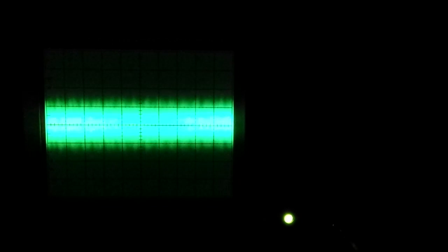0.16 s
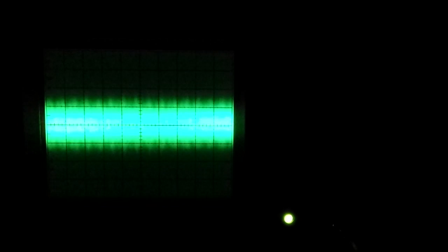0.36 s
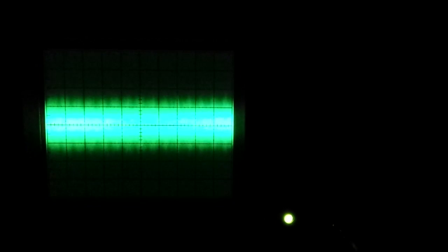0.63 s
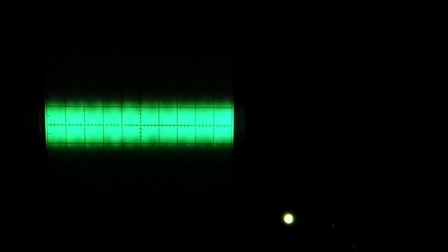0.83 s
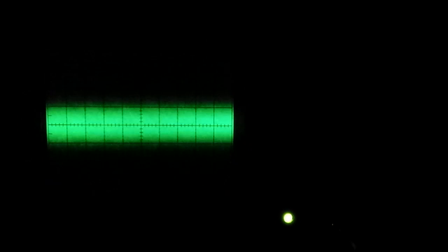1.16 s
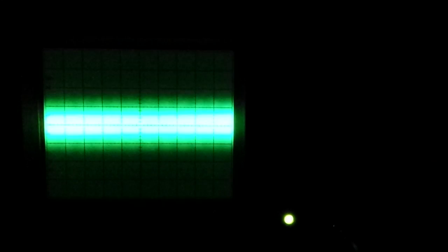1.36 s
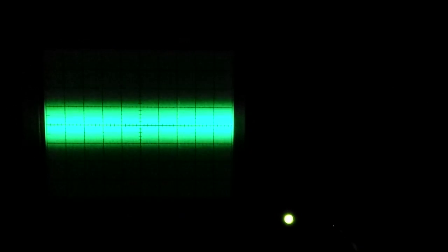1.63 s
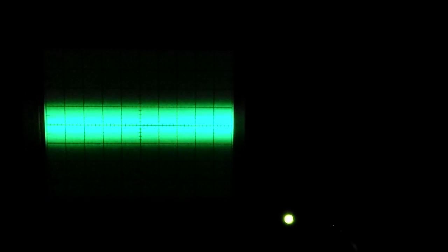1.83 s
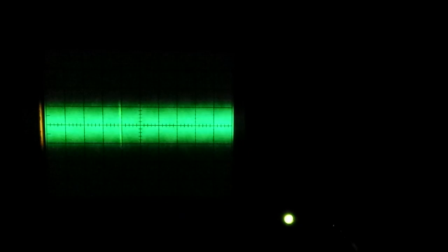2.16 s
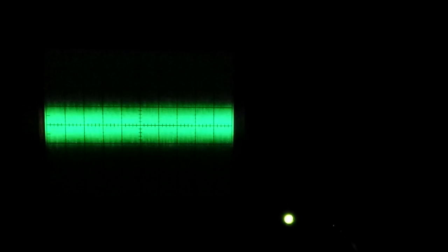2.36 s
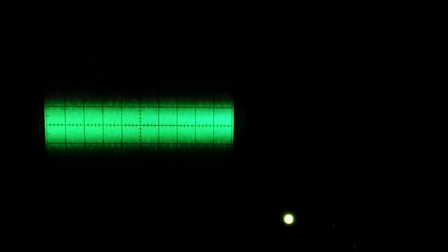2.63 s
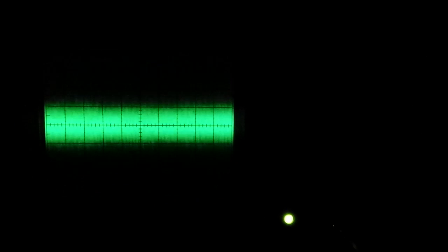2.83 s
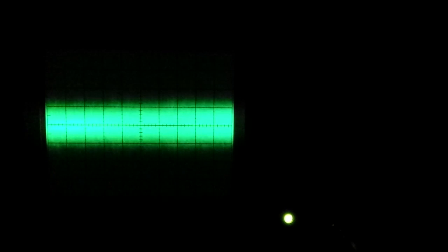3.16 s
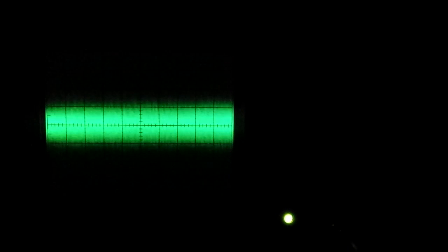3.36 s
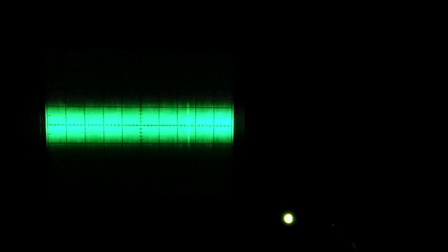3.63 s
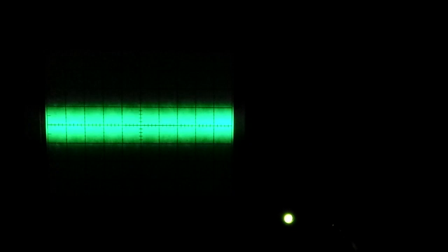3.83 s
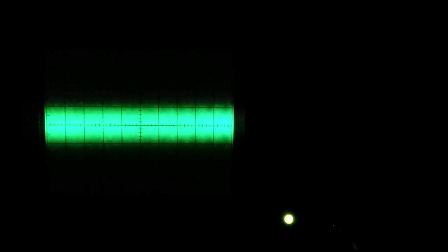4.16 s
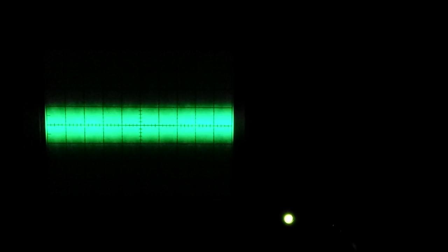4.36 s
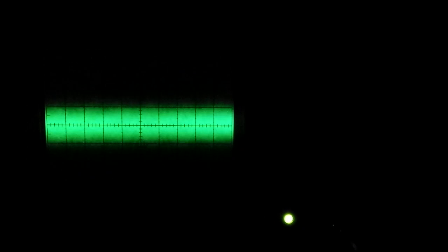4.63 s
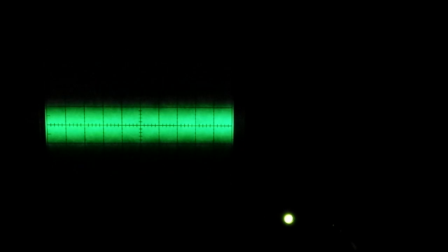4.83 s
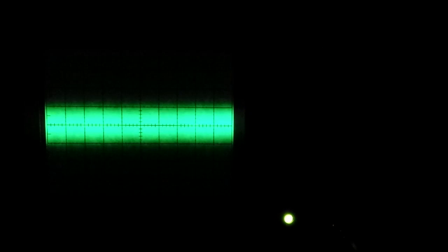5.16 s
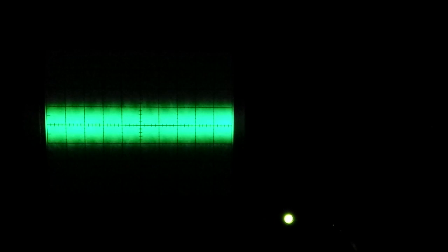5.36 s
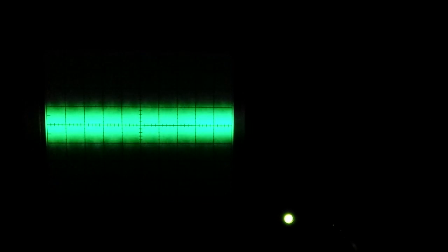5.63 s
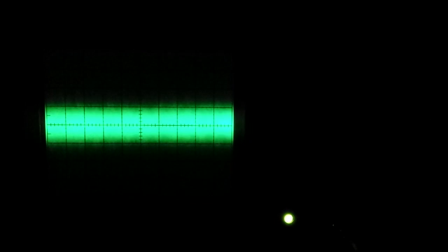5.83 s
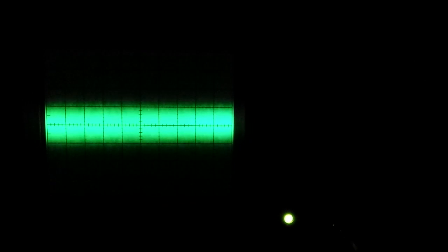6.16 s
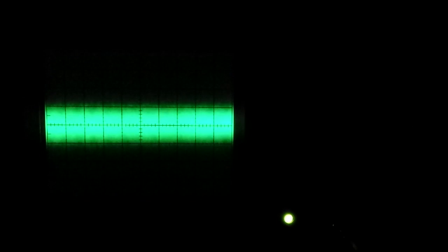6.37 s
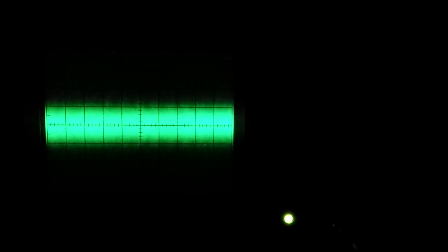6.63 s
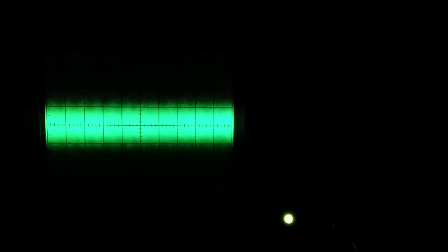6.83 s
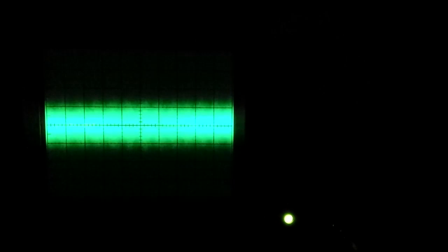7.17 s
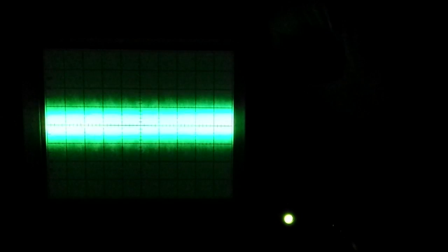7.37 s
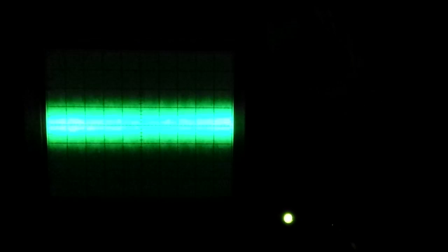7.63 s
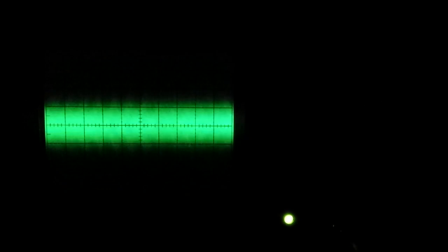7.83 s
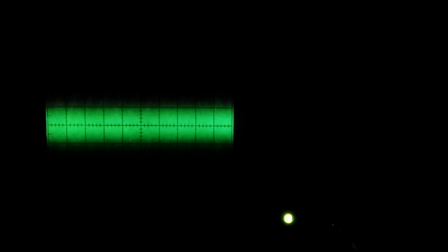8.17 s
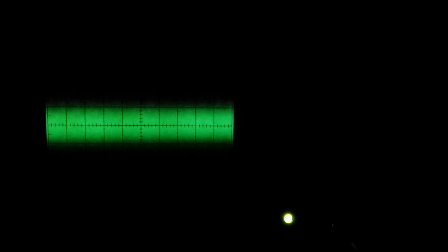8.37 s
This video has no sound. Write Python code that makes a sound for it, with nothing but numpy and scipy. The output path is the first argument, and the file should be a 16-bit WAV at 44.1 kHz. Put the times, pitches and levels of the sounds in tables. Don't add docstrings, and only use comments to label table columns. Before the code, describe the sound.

In a small quiet room, a close, bright stereo microphone with soft hiss and low rumble picks up rotary switches on a metal instrument case. A very faint far motor hums around 0.3 to 2 seconds, with a weaker touch near 3.6. Crisp bouncing snaps come at 0.6, 0.9, 1.2 and 1.4 seconds, then a quick run of five from 2.0 to 2.25, the first the sharpest. A softer click follows at 2.8, three more at 3.2, 3.3 and 3.5, and weaker ones at 4.35 and 4.85. Each has a shaft knock, faint case ring and short echo. Barely audible squeaks precede the last two clicks. Light finger taps begin near 4.8, with a tiny spring ping at 5.45, soft touches from 6.05, the loudest tap at 6.36 and a faint one at 6.8. Only hiss and rumble remain until 8.5.

```python
import sys
import numpy as np
from scipy import signal
from scipy.io import wavfile
from scipy.ndimage import uniform_filter1d

SR = 44100
rng = np.random.default_rng(int(sys.argv[2]) if len(sys.argv) > 2 else 0)


def inscribe(sig):
    pcm = np.round(np.clip(np.atleast_2d(sig).T, -1, 1) * 32767)
    wavfile.write(sys.argv[1], SR, pcm.astype(np.int16))


def ratio(d):
    e = np.asarray(d, float) / 20
    return 10 ** e


N = 375368

# t/s, level/dB
DRIFT = [(0, 8), (.5, 4.5), (2.7, 3.5), (4.1, 1.1), (4.7, 1), (5.3, 0.5), (6, 2.3), (7.4, 4), (7.7, 1.5),
         (8.51, 3.3)]
# f/Hz, level/dB (per Hz)
AIR = [(12, -30), (20, -4), (27, -11.5), (80, 1.5), (300, -5.5), (500, -6.5), (816, -11.5), (2120, -17),
       (4400, -18.5), (6710, -8), (9670, -19), (14900, -19.5), (15500, -25), (15800, -51)]
# f/Hz, likeness/1
AIR_LIKENESS = [(60, 0.34), (180, 0.54), (550, 0.27), (1650, 0.012), (4970, 0.0091), (15000, 0.12)]
# f/Hz, level/dB
AIR_LEAN = [(60, -0.5), (180, -4.5), (550, -2), (1650, 0), (4970, -9.0), (15000, -3)]
AIR_DB = -64.5
RUMBLE_SHARE, MOTOR_RUMBLE_DB, MOTOR_LEAVES_S, LEAVING_S = 0.71, 2, 2.2, 0.48

# t/s, hold/s, level/dB
MOTOR_LOADS = [
    (.25, .8, -63.5),
    (1.25, .75, -66),
    (3.6, .25, -73),
]
HUM_HZ, HUM_IDLE_DB = 71.5, -79
HUM_RISE_DB_PER_S, HUM_FALL_DB_PER_S = 55, 32

# first contact t/s, snap peak level/dB, blow to shaft and panel level/dB,
# case boom level/dB, hardest bounce after t/ms
DETENTS = [(0.6350, -22, -38, -38, 3.5), (0.9361, -20, -37.5, -42, 3.1), (1.1883, -20, -38, -48.5, 3.1),
           (1.4436, -20, -38.5, -45, 1.5), (2.0084, -14.5, -35.5, -44, 1.4),
           (2.0355, -19.5, -33.5, -35, 2.4), (2.0736, -20, -35.5, -49, 1.2), (2.1397, -20, -34, -38, 1.2),
           (2.2483, -20, -35.5, -40, 1.6), (2.7730, -27, -44.5, -39, 4.5), (3.1712, -20.5, -39, -41.5, 3.1),
           (3.3157, -22.5, -41, -41, 4.1), (3.4897, -23, -41.5, -43, 3.5), (4.3528, -26.5, -44.5, -46, 3.1),
           (4.8545, -29, -43, -45.5, 2.5)]
# f/Hz, level/dB
SNAP = [(2350, -40), (4000, -9), (4450, -13.5), (5160, -8), (5680, -5), (6200, -5.5), (7070, 2), (8650, -2),
        (11100, -10), (12400, -16), (13400, -16.5), (14800, -16.5), (15900, -31), (16800, -39)]
# f/Hz, level/dB
KNOCK = [(600, -17), (900, -7.5), (1300, -3), (1650, -4.5), (1950, -7.5), (2300, -8), (2700, -3.5),
         (3000, -6), (3300, -2), (3650, -10), (4050, 0), (4500, -13.5), (5500, -12), (8000, -45)]
# f/Hz, level/dB, time to fall 60 dB t/s
SHAFT = [(1566, -8, 0.054), (1606, 9, 0.086), (1718, 10, 0.11), (2520, 0, 0.039), (3220, 15, 0.026),
         (3870, 8, 0.06), (6400, -23, .06), (7780, -31, 0.043), (7100, -1, .06), (10000, 15, .05)]
# f/Hz, level/dB, time to fall 60 dB t/s
PANEL = [(423, -7, 0.13), (446.6, -4, 0.42), (501.7, -3.5, 0.32), (548.7, -6.5, 0.54), (621, 3, 0.12),
         (617, -3.5, 0.091), (641, 2.5, 0.11), (687.5, -9, 0.15), (748, -14, .25), (833, -12, 0.44),
         (875, -11, 0.1)]
# f/Hz, level/dB, time to fall 60 dB t/s
BOOM = [(118.5, -1, 0.64), (143.3, 3.5, 0.44), (185, -6.5, 0.49), (212.2, -1.5, 0.48), (242.8, -0.5, 0.41),
        (265.1, -4, 0.31), (312.3, -10.5, 0.36), (333.5, -11.5, 0.59)]
# f/Hz, level/dB
BODY = [(59, -28.5), (100, -11), (156, 3), (237, -2), (371, -7), (580, -5), (714, -7), (1200, -21),
        (1560, -61), (2640, -120)]
# f/Hz, level/dB
COVER = [(1100, -50), (1450, -8), (1650, 0), (1800, -5), (2200, -50)]
COVER_DB, EARLIER_DB = -35.5, -51
FIRST_DB, SHAFT_DB, SNAP_PAN_DB = -3.5, 2, -4
BUZZ_DB, BUZZ_T60_S, BOUNCE_FADE_DB, SCRAPE_DB = -15, 0.057, 6.5, -25

# f/Hz, time to fall 60 dB t/s
ROOM_DECAY = [(100, 1), (260, 0.13), (700, 0.25), (1840, 0.31), (4850, 0.3), (12800, 0.26)]
# f/Hz, level/dB
ROOM_TONE = [(100, -18), (400, 7.5), (1500, 11), (5000, 6), (9000, 3.5), (15000, 3.5)]

# t/s, peak level/dB, hollow f/Hz, nail tick level/dB, thud level/dB (last two against the peak)
TAPS = [
    (1.937, -51.5, 1260, 10, -22),
    (4.779, -50.5, 900, 6.5, -5),
    (5.453, -47.5, 1850, 3, -2),
    (5.789, -66.5, 1490, 17.5, -9),
    (6.053, -61, 1100, 14, -3),
    (6.185, -58, 600, -1, -4),
    (6.298, -55, 1090, -33, -6),
    (6.363, -30.5, 1100, -0.5, -17.5),
    (6.825, -52.5, 2000, 9, 1),
]
# f/Hz, level/dB
TICK = [(700, -19), (1500, -10), (2500, -3), (4300, -2), (5500, -3), (7000, 4.5), (9500, -14), (14000, -16),
        (16500, -62)]
# f/Hz, level/dB
THUD = [(60, -47), (110, -4), (230, -0.5), (350, -7), (500, -16), (700, -12), (900, -21.5), (1500, -61)]
HOLLOW_Q, HOLLOW_LOW_CUT = 2.7, 0.62
RUB_DB, RUB_T60_S = -15, 0.061

# t/s, length/s, f/Hz, level/dB
SQUEAKS = [
    (4.245, .105, 820, -68),
    (4.67, .11, 540, -70),
]
# f/Hz, level/dB, time to fall 60 dB t/s
PING = [(9400, 0, .07), (9150, -6, .05)]
PING_S, PING_DB = 5.455, -59

# f/Hz, level/dB
PORTS = [(100, -1), (1000, -2.5), (4000, 0.5), (8000, 1), (14000, -9)]
EDGE_HZ = 16550


def evened(x):
    return x / np.sqrt(np.mean(x ** 2) + 1e-20)


def read(points, hz):
    f, value = np.transpose(points)
    return np.interp(np.log(hz + 1), np.log(f + 1), value)


def add(mix, s, sound):
    part = mix[:, round(s * SR):][:, :sound.shape[1]]
    part += sound[:, :part.shape[1]]


def colour(points, size=2048):
    hz = abs(np.fft.fftfreq(size, 1 / SR))
    log_gain = np.log(ratio(np.maximum(read(points, hz), -100)))
    response = np.fft.ifft(np.exp(np.conj(signal.hilbert(log_gain)))).real
    return response[None, :size // 2]


def burst(bounces, points):
    out = signal.fftconvolve(bounces, colour(points), axes=1)
    return out / abs(out).max()


def ring(modes, rise, spread_db, detune, apart):
    t = np.arange(SR // 2) / SR
    hz, db, t60 = np.transpose(modes)[:, :, None]
    luck = rng.standard_normal((len(modes), 4, 1))
    phase = 2 * np.pi * hz * (1 + detune * luck[:, 0]) * t + 2 * luck[:, 1]
    swell = 1 - np.exp(-t / rise)
    size = ratio(db + spread_db * luck[:, 2] - 60 * t / t60) * swell
    out = np.array([(size * np.sin(phase + side * apart * luck[:, 3])).sum(0) for side in (-.5, .5)])
    return out / abs(out).max()


def rumble(points, rise, t60):
    t = np.arange(round(.4 * SR)) / SR
    envelope = ratio(-60 * t / t60) * (1 - np.exp(-t / rise))
    shared, differing = rng.standard_normal((2, len(t))) * envelope
    return burst(np.array([shared + 0.35 * differing, shared - 0.41 * differing]), points)


def air():
    frames, hz = N // 256 + 5, np.fft.rfftfreq(1024, 1 / SR)
    a, b, c, d, patches = rng.standard_normal((frames, 513, 5)).T
    patches = uniform_filter1d(uniform_filter1d(patches, 8, 0), 14, 1)
    patches = evened(patches) * .8
    t = np.arange(frames) * 256 / SR
    low = 1 / (1 + (hz[:, None] / 2500.) ** 2)
    near = np.clip(1 - (t - MOTOR_LEAVES_S) / LEAVING_S, 0, 1)
    drift = (1 - low + RUMBLE_SHARE * low) * np.interp(t, *np.transpose(DRIFT))
    drift = drift + low * near * MOTOR_RUMBLE_DB
    same = np.clip(read(AIR_LIKENESS, hz), -1, 1)[:, None]
    left = a + 1j * b
    right = same * left + np.sqrt(1 - same ** 2) * (c + 1j * d)
    lean = read(AIR_LEAN, hz)[:, None] / 2
    level_db = read(AIR, hz)[:, None] + drift + patches + np.array([lean, -lean])
    z = np.array([left, right]) * ratio(level_db)
    noise = signal.istft(z, nperseg=1024, noverlap=768)[1][:, :N]
    return ratio(AIR_DB + 1.04) * noise / np.sqrt(np.mean(noise[:, -SR:] ** 2))


def hum():
    t = np.arange(N) / SR
    waver_hz = .7 * evened(uniform_filter1d(rng.standard_normal(N), 15000))
    loads = []
    for s, hold, db in MOTOR_LOADS:
        rise = HUM_RISE_DB_PER_S * np.maximum(s - t, 0)
        fall = HUM_FALL_DB_PER_S * np.maximum(t - s - hold, 0)
        loads.append(db - rise - fall)
    idle = np.where(t < MOTOR_LOADS[-1][0], HUM_IDLE_DB, -120)
    level_db = np.maximum(np.max(loads, axis=0), idle) + 2
    return ratio(level_db) * np.sin(2 * np.pi * np.cumsum(HUM_HZ + waver_hz) / SR)


def earlier_boom():
    out = np.zeros((2, N))
    add(out, 0, ratio(EARLIER_DB) * ring(BOOM, 0.08, 2.6, 0.0042, 0.99))
    return out


def chatter(count, seconds, rebound_ms, first_db, fade_db, lead_db, grit_db, grit_t60, delay):
    lead, t = round(.003 * SR), np.arange(round(.08 * SR)) / SR
    train = np.zeros(len(t))
    when, sign = rng.random((count, 2)).T
    train[(when * seconds * SR).astype(int)] = np.sign(sign - .5) * ratio(-3.0 - fade_db * when)
    train[0] = ratio(first_db)
    train[round(rebound_ms * SR / 1000)] = -1
    grit_level = ratio(grit_db - 60 * abs(t - rebound_ms / 1000) / grit_t60)
    grit = grit_level * rng.standard_normal((2, len(t)))
    scrape = ratio(lead_db) * rng.standard_normal((2, lead)) * np.linspace(.1, 1, lead) ** 2
    return np.hstack([scrape, grit + [np.roll(train, delay), train]])


def detent(snap_db, blow_db, boom_db, rebound_ms):
    bounces = chatter(count=7, seconds=.008, rebound_ms=rebound_ms, first_db=FIRST_DB,
                      fade_db=BOUNCE_FADE_DB, lead_db=SCRAPE_DB, grit_db=BUZZ_DB, grit_t60=BUZZ_T60_S,
                      delay=rng.integers(1, 5))
    pan = ratio(np.array([[SNAP_PAN_DB / 2], [-SNAP_PAN_DB / 2]]))
    out = np.zeros((2, SR // 2))
    add(out, 0, ratio(snap_db + 3.5) * burst(bounces, SNAP) * pan)
    add(out, 0, ratio(blow_db + SHAFT_DB + 6.5) * burst(bounces, KNOCK))
    add(out, .003, ratio(blow_db + SHAFT_DB - 12) * ring(SHAFT, 0.0008, 4., 0.012, 0.58))
    add(out, .004, ratio(blow_db - 1.0) * rumble(BODY, 0.0079, 0.32))
    add(out, .004, ratio(blow_db - 1.5) * ring(PANEL, 0.0028, 2.3, 0.0168, 0.21))
    add(out, .004, ratio(boom_db) * ring(BOOM, 0.033, 4.0, 0.0093, 0.33))
    return out


def cover_shimmer():
    out = np.zeros((2, N))
    for s, snap_db, *_ in DETENTS:
        shimmer = rumble(COVER, .01, .8)
        fade = signal.windows.tukey(shimmer.shape[1], .3)
        add(out, s, ratio(snap_db + COVER_DB) * shimmer * fade)
    return out


def room(x, gap=.004, shared_hz=700):
    taps = np.zeros((2, SR))
    at = np.arange(0, SR - 20, 20) + rng.integers(0, 20, (2, SR // 20 - 1))
    np.put_along_axis(taps, at, rng.choice([-1., 1.], at.shape), 1)
    hz, t, z = signal.stft(taps, SR, nperseg=256)
    same = 1 / (1 + (hz[:, None] / shared_hz) ** 2)
    z = np.array([z[0], same * z[0] + np.sqrt(1 - same ** 2) * z[1]])
    level_db = read(ROOM_TONE, hz)[:, None] - 60 * t / read(ROOM_DECAY, hz)[:, None]
    tail = signal.istft(z * ratio(level_db), SR, nperseg=256)[1]
    tail *= np.clip(np.arange(tail.shape[1]) / SR / gap - 1, 0, 1)
    return signal.fftconvolve(x, tail / np.linalg.norm(tail[0]), axes=1)[:, :N]


def tap(db, hz, tick_db, thud_db):
    touch = chatter(count=3, seconds=.005, rebound_ms=1.5, first_db=1.5, fade_db=6, lead_db=-50,
                    grit_db=RUB_DB, grit_t60=RUB_T60_S, delay=2)
    width_hz, low_hz = hz / HOLLOW_Q, hz * HOLLOW_LOW_CUT
    f = np.geomspace(300, 6000, 60)
    peak_loss = 1 + (2 * (f - hz) / width_hz) ** 2
    bass_loss = 1 + (low_hz / f) ** 6
    hollow = list(zip(f, -10 * np.log10(peak_loss * bass_loss)))
    out = np.zeros((2, SR // 2))
    add(out, 0, burst(touch, [(80, -60)] + hollow + [(9000, -60)]))
    add(out, 0, ratio(tick_db) * burst(touch, TICK))
    add(out, .003, ratio(thud_db) * rumble(THUD, 0.0057, 0.45))
    return ratio(db) * out


def squeak(seconds, hz, db):
    t = np.arange(round(seconds * SR)) / SR
    waver = .003 * evened(uniform_filter1d(rng.standard_normal(len(t)), 600))
    tone = np.sin(2 * np.pi * np.cumsum(hz * (1 + waver)) / SR)
    tone = tone * signal.windows.tukey(len(t), .3)
    return ratio(db) * np.array([tone, tone])


def spring_ping():
    return ratio(PING_DB) * ring(PING, 0.0015, 1.1, 0.0012, 0.77)


def ports(x, low_hz=95):
    x = signal.sosfilt(signal.butter(3, low_hz, "high", fs=SR, output="sos"), x)
    facing = np.vstack([colour([(f, side * db) for f, db in PORTS]) for side in (.5, -.5)])
    return signal.oaconvolve(x, facing, axes=1)[:, :N]


def scene():
    hands = np.zeros((2, N))
    for s, *row in DETENTS:
        add(hands, s - .003, detent(*row))
    for s, *row in TAPS:
        add(hands, s - .003, tap(*row))
    for s, *row in SQUEAKS:
        add(hands, s, squeak(*row))
    add(hands, PING_S, spring_ping())
    panel = ports(hands + ratio(-6.0) * room(hands))
    return panel + air() + hum() + earlier_boom() + cover_shimmer()


def top_cut(x):
    return signal.sosfilt(signal.butter(12, 16790, fs=SR, output="sos"), x)


def record(dry):
    edge = signal.firwin(255, EDGE_HZ, window=("kaiser", 9), fs=SR)
    mix = signal.oaconvolve(dry, edge[None], "same", axes=1)
    return top_cut(mix)


dry = scene()
out = record(dry)
inscribe(out)
```